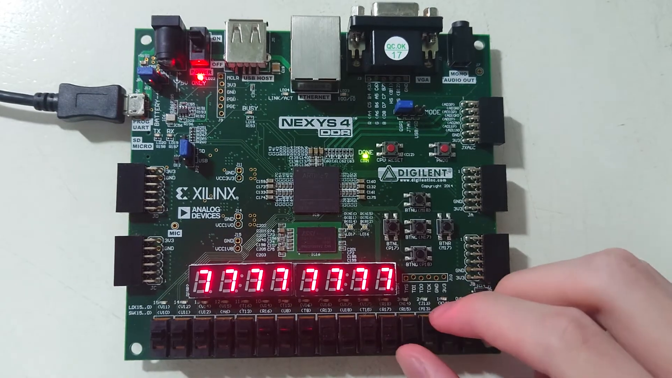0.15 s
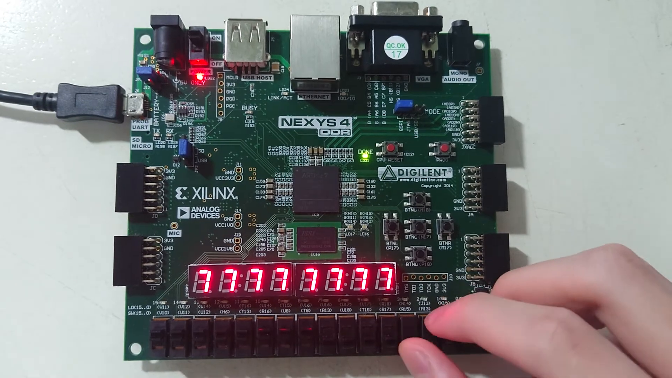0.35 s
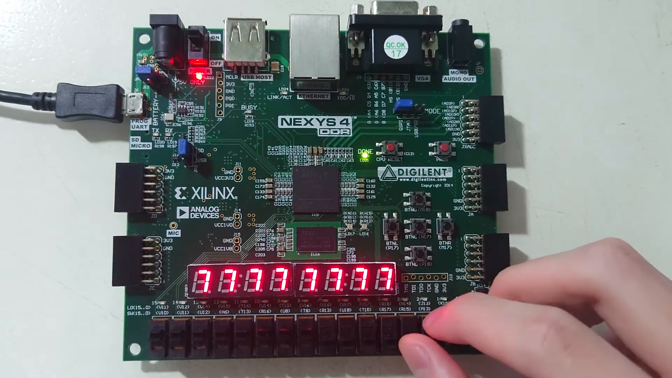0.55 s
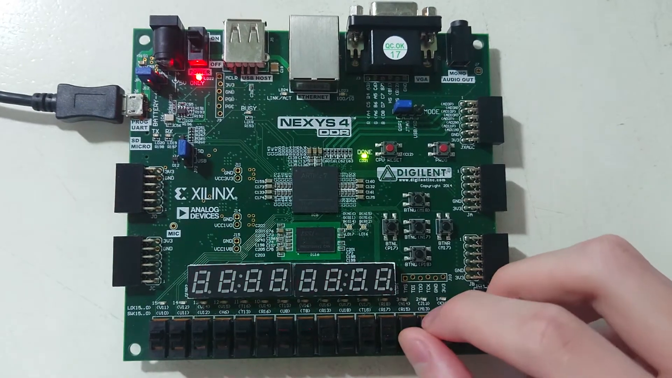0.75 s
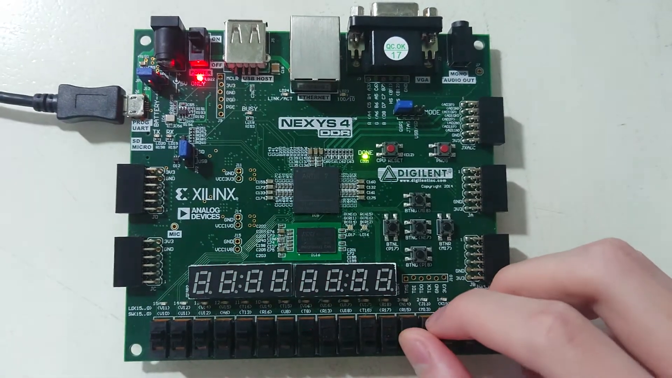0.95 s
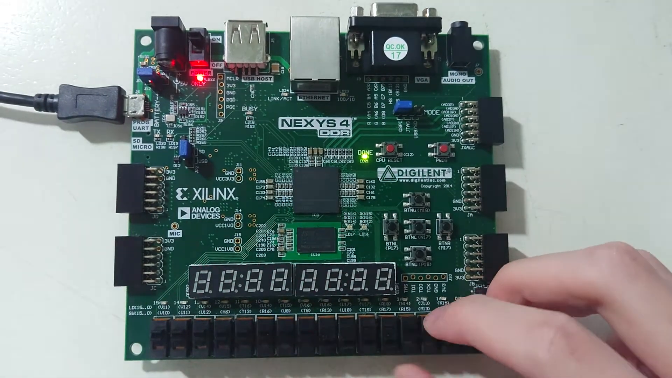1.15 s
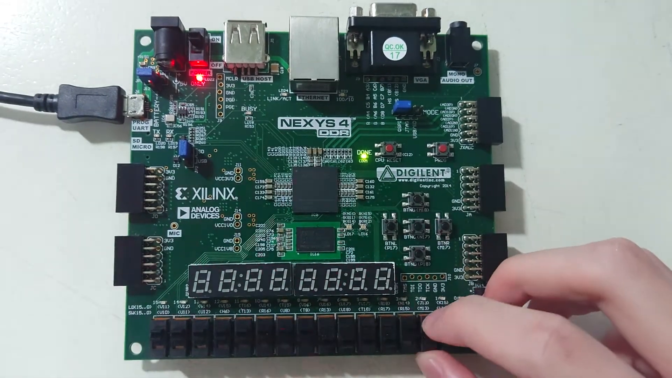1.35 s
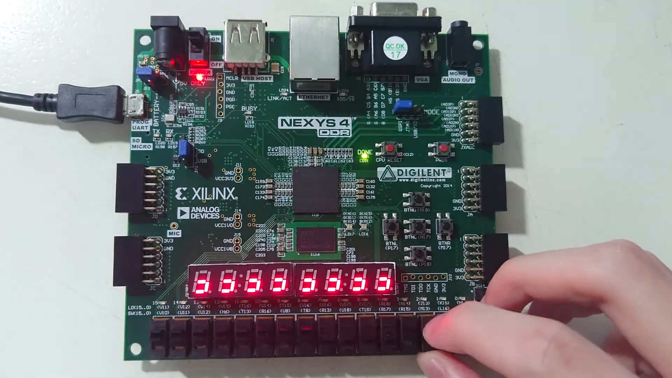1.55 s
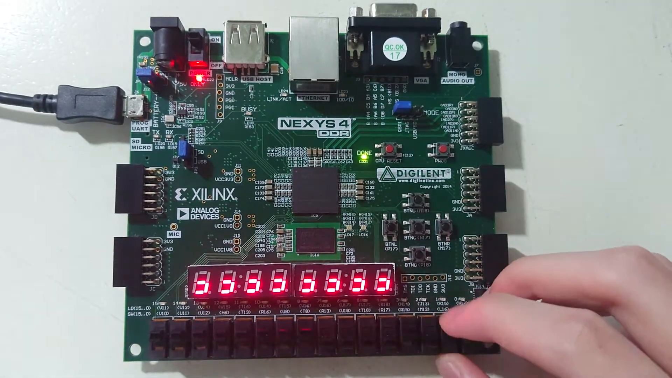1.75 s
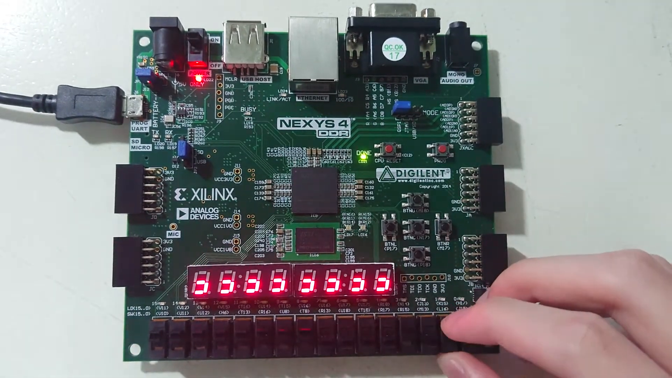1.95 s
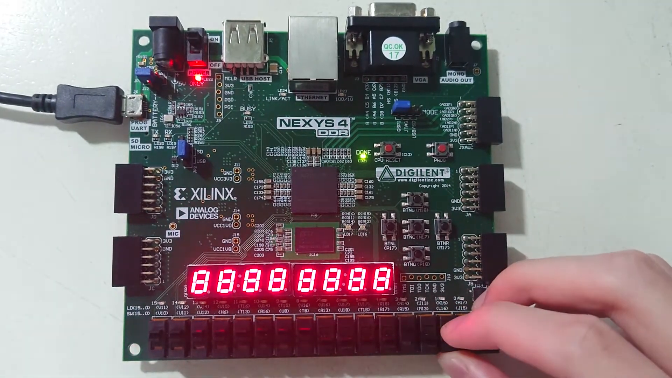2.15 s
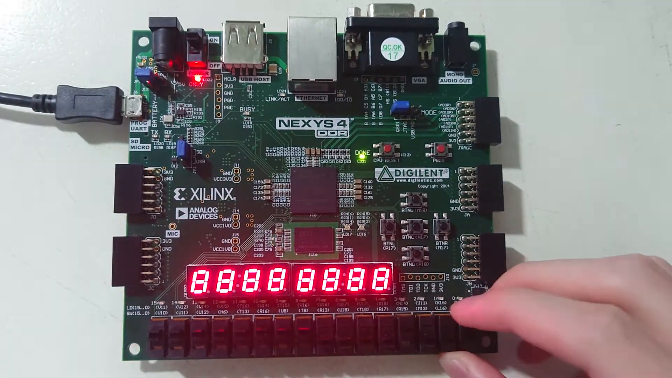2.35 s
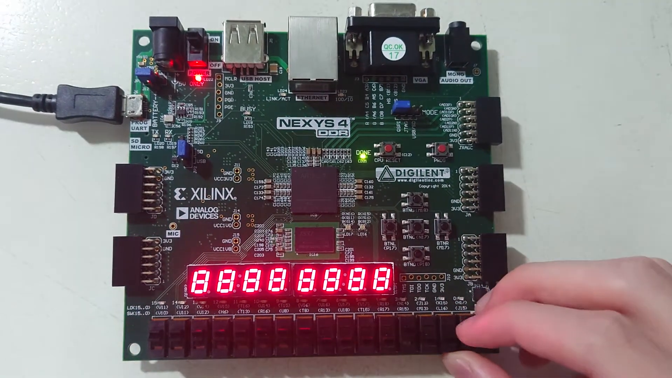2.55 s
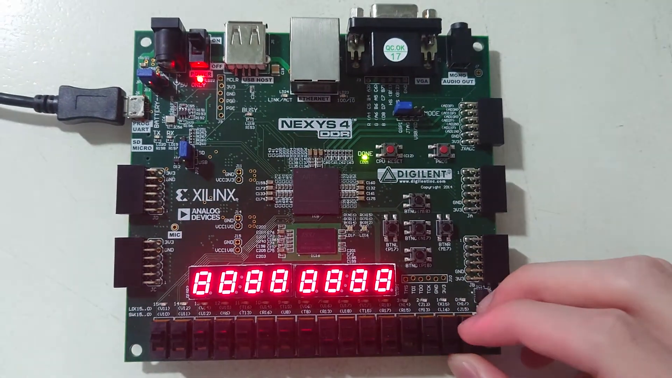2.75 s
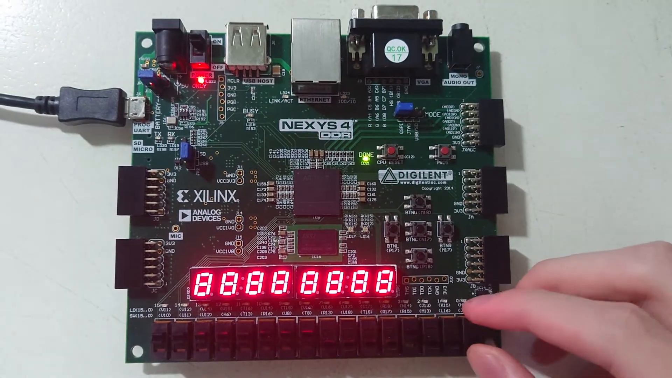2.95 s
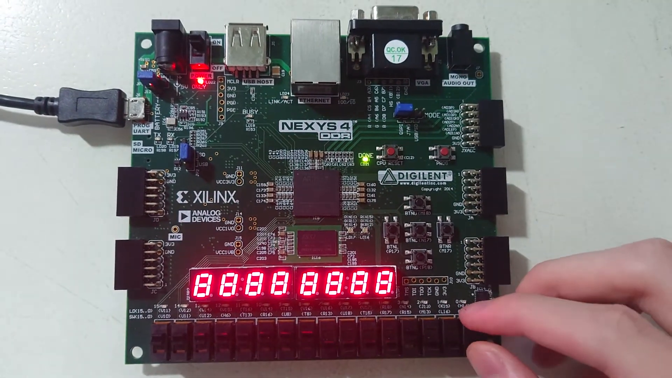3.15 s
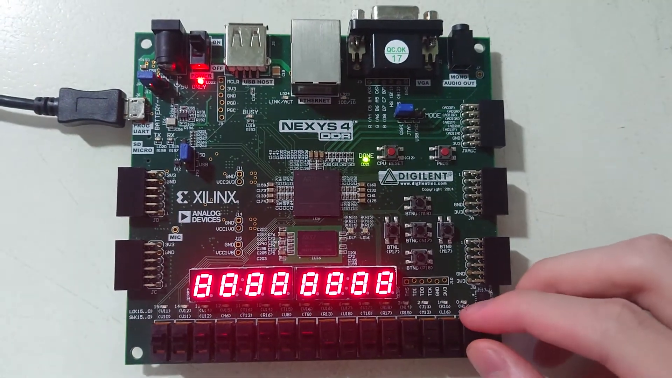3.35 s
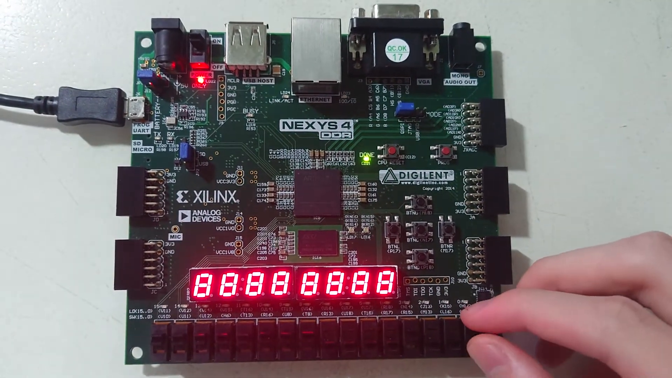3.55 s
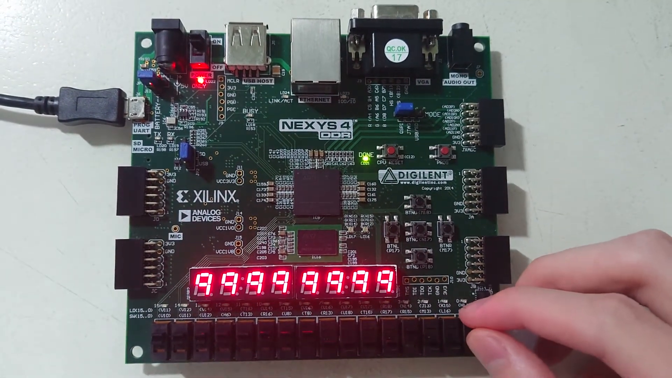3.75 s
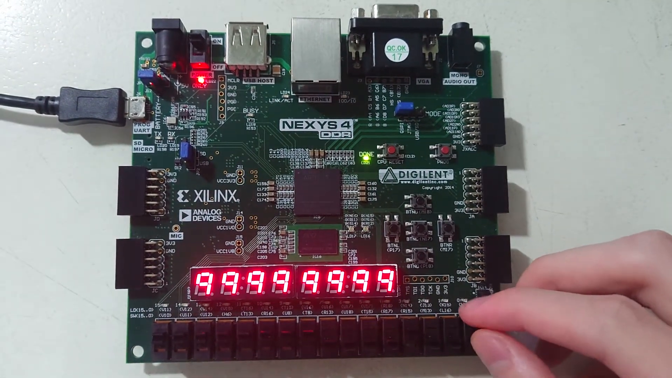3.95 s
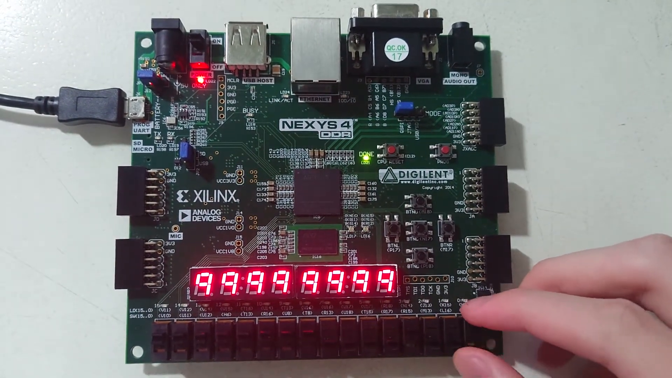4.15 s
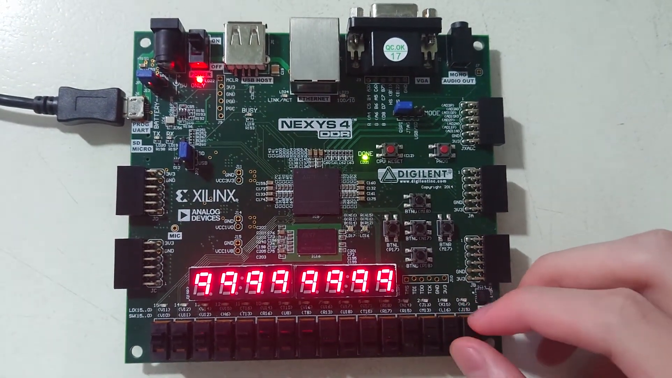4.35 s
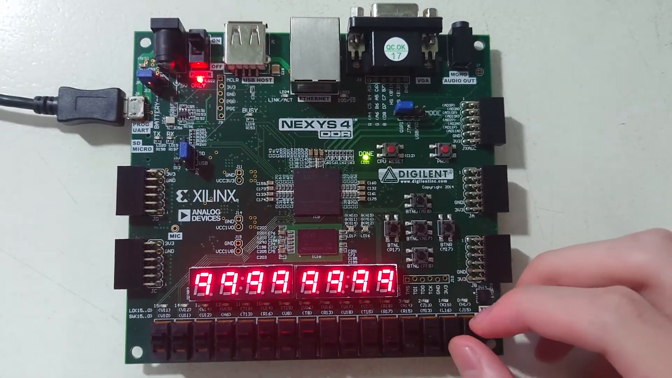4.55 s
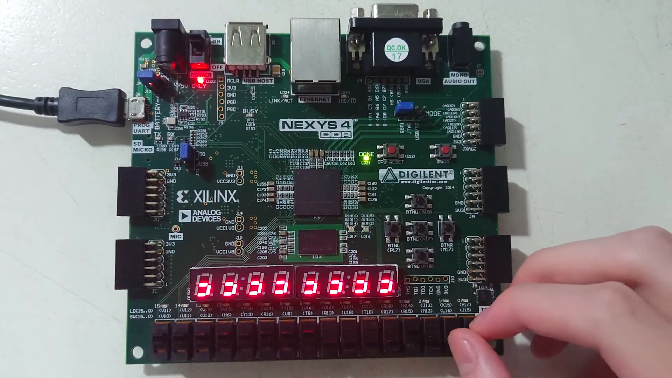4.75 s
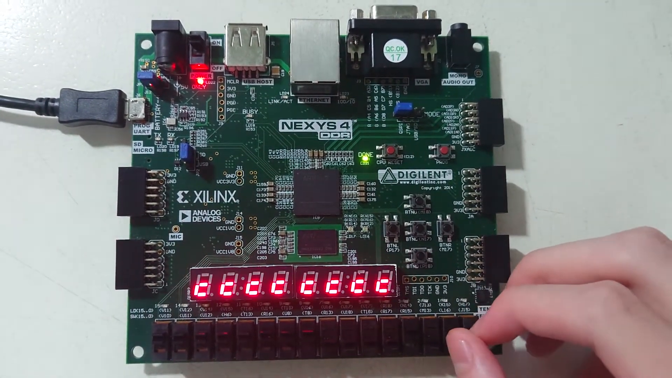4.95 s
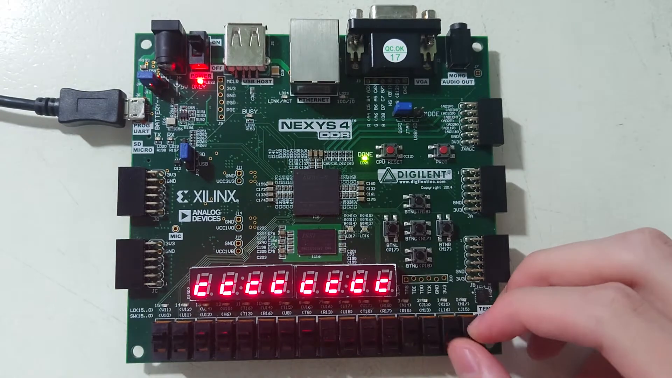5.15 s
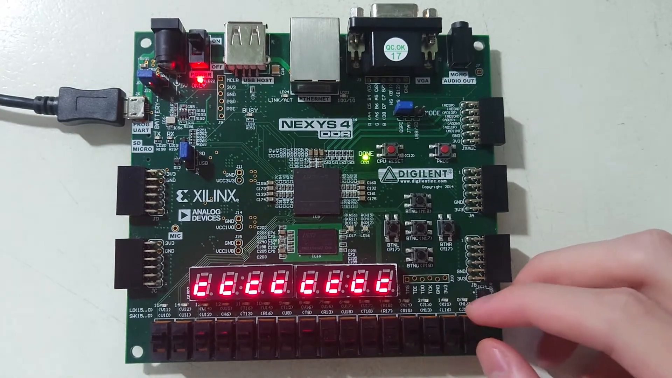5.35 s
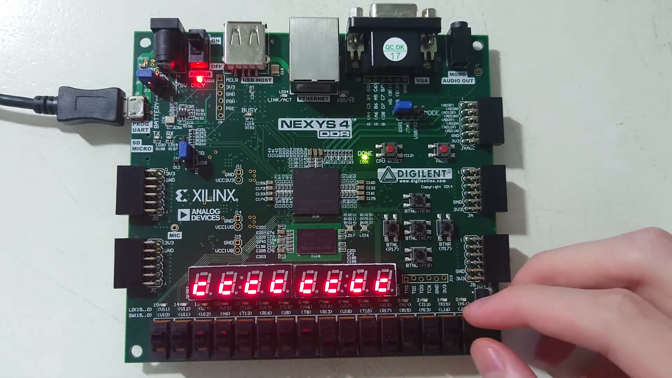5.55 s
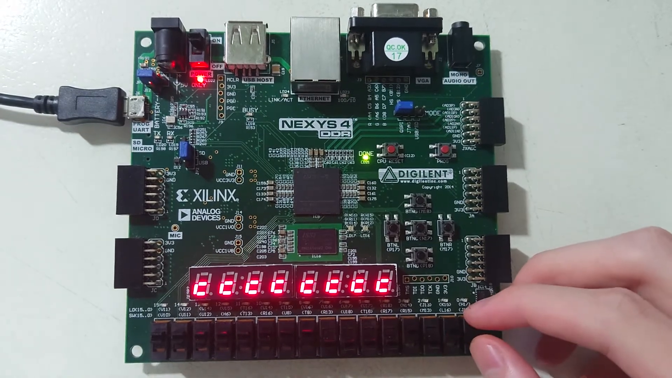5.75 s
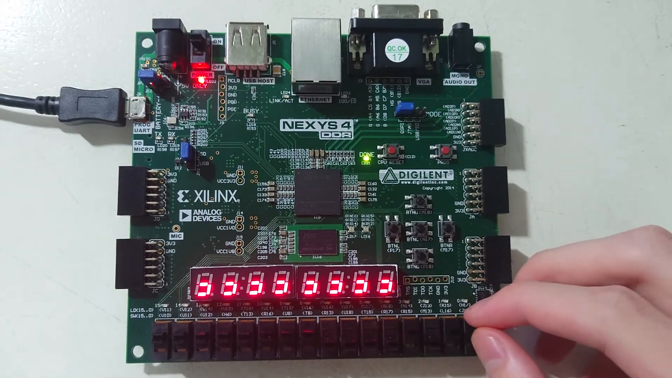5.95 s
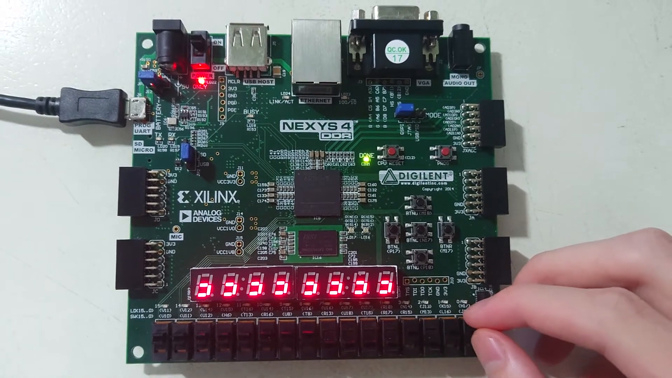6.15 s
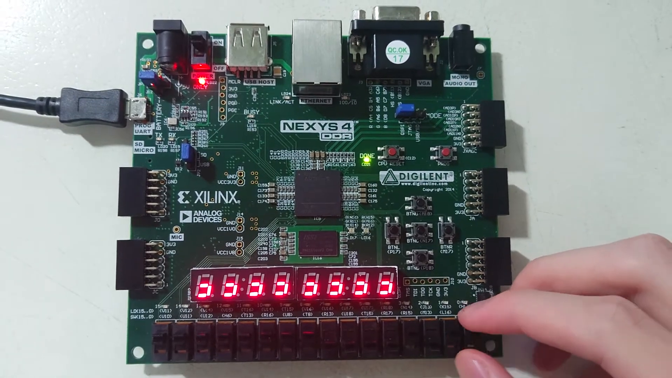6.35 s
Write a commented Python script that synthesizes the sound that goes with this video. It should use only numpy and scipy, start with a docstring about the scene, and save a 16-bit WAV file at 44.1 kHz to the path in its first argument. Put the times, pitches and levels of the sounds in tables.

```python
"""Mains hum throbs against a motor tone, over deep drones, a whirring fan and soft hiss in a quiet room.
Then a finger nudges a small slide switch on a circuit board and flips it six times, on a desk.
Each snap sets damped modes of board, case and contact spring ringing for a few hundredths of a second,
with a burst of grating noise and a faint, diffuse room tail.
The machines are drifting sines with moving levels; the air is stereo noise shaped over frequency."""
import sys
import numpy as np
from scipy import signal
from scipy.fft import rfft, irfft
from scipy.io import wavfile

SR = 44100
rng = np.random.default_rng(int(sys.argv[2]) if len(sys.argv) > 2 else 0)


def file_out(sig):
    """Save sig as 16-bit WAV at sys.argv[1]."""
    # one column per channel
    cols = np.atleast_2d(sig).T
    # limit, then scale
    lim = np.clip(cols, -1, 1)
    pcm = np.round(lim * 32767).astype(np.int16)
    wavfile.write(sys.argv[1], SR, pcm)


N = 282353
TIME = np.arange(N) / SR  # s

# The mains hum, and a motor tone this much faster that dips it once a beat, first near DIP_S.
MAINS_HZ, BEAT_HZ, DIP_S = 120, 2.27, 0.23
# Weaker mains and motor tones: (frequency [Hz], level [dB], left minus right [dB])
WEAK_HUM = [(34.8, -77.5, 0), (117.4, -59, -9), (126.6, -62, 3), (174.3, -70.5, 7), (240, -62, -18)]

MOTOR_HZ, SHAFT_HZ = 58.2, 66.7
# The low motor drone sinks, partly returns and fades: (time [s], level [dB])
MOTOR_LEVEL = [(0, -52.5), (1.3, -55.5), (1.9, -65), (4, -59), (6.4, -70)]
# The fan shaft's drone swells and sinks slowly about its mean level.
SHAFT_DB, SHAFT_SWING_DB, SHAFT_PERIOD_S, SHAFT_PEAK_S = -60, 3.5, 5.7, 0.72

# Weak fan tones: (frequency [Hz], level ahead of the fan's gain [dB], left minus right [dB])
WEAK_FAN = [(133.9, -61, -1), (200.5, -66, 4), (402.8, -64.5, 4), (471, -78, -10), (537, -68, -12),
            (643, -66, 4), (867.5, -66, -2), (952, -72, -7), (1014, -68, -1), (1347, -74.5, 10),
            (1403, -79, -3)]
# The fan's two strongest tones, near four and five times the shaft rate:
# (frequency [Hz], left minus right [dB])
BLADES = [(269.3, -3.5), (335, 0.5)]
# Level of the lower blade tone, ahead of its waver: (time [s], level [dB])
LOW_BLADE_LEVEL = [(0, -61), (.85, -66), (1.1, -55), (1.4, -70), (1.9, -60.5), (2.85, -60.5), (3.2, -74),
                   (3.5, -64), (3.75, -70), (4.05, -59.5), (4.55, -62.5), (4.75, -50), (5.1, -63.5),
                   (5.6, -64.5), (6.4, -59.5)]
# Level of the higher blade tone, ahead of its waver: (time [s], level [dB])
HIGH_BLADE_LEVEL = [(0, -63.5), (1.5, -58.5), (2.2, -59), (2.65, -55), (3.05, -58), (3.35, -51),
                    (3.55, -60.5), (3.8, -56.5), (4.4, -58.5), (4.88, -55.5), (5.1, -65), (5.55, -57.5),
                    (5.93, -59.5), (6.08, -73), (6.4, -55.5)]

# The draught through the machines rises from its calm level in one broad swell.
CALM_DB, SWELL_DB, SWELL_PEAK_S, SWELL_HALF_WIDTH_S = -1.23, 2.5, 4.1, 1.9
# Broad colour of moving air and hiss, ahead of gain: (frequency [Hz], density [dB per Hz])
AIR_COLOUR = [(25, -100), (55, -76.5), (80, -81), (105, -70.5), (145, -71.5), (200, -85), (310, -77.5),
              (520, -80), (1250, -84), (1800, -86), (3800, -93.5), (7000, -96), (8000, -101), (14000, -99)]
# Peaks and hollows in the air's sound: (frequency [Hz], half width [Hz], boost [dB])
AIR_PEAKS = [(337, 11, 2.5), (360, 23, -3.5), (402, 27, 2), (484, 47, -4), (641, 28, 2), (738, 46, -5),
             (1003, 84, 2), (1174, 36, 4.5), (1350, 29, 1.5), (1770, 160, 1.5), (3230, 130, 2.3),
             (3630, 180, -1), (7900, 220, -4)]
# Stereo balance of the air: (frequency [Hz], left minus right [dB])
AIR_PAN = [(60, 0), (220, -1.5), (380, 1), (520, -4), (630, -1.5), (780, -5.5), (1000, 0.5), (1700, 2),
           (2400, 4.5), (3600, 1), (7000, -1.5), (15000, -1)]
# Likeness of left and right air: (frequency [Hz], correlation [-1 to 1])
AIR_LIKENESS = [(130, 0.95), (290, 0.73), (640, 0.44), (1400, -0.39), (3000, -0.0024)]

# The slider hitting its stop, rebounding or being nudged; levels are ahead of the switch's gain:
# (time [s], contact [ms], board level [dB], case level [dB], spring level [dB],
#  board favoured [Hz], case favoured [Hz], spring favoured [Hz],
#  board damped by the finger [Hz], case damped [Hz], spring damped [Hz])
CLICKS = [(0.7105, 1.6, -66, -48, -60, 4015, 5650, 15350, 2500, 6700, 10500),
          (1.5398, 1, -36, -29.5, -25.5, 4080, 6930.0, 14000, 3480, 4800, 10300),
          (1.5438, 0.7, -39.5, -37, -33, 2300, 6650.0, 15350.0, 3500, 5400, 10080.0),
          (2.1418, 1.4, -34.5, -33, -30.0, 2210, 5850, 12300, 2600, 5000, 13000),
          (2.1464, 0.9, -40, -37, -42.0, 4330, 5500, 13110.0, 3750, 7300, 10530.0),
          (2.1576, 1.5, -47.5, -33.5, -43.5, 3530.0, 7000, 9650.0, 2820.0, 4890.0, 8100.0),
          (2.1595, 1.3, -50.0, -43, -46.0, 3360.0, 7260.0, 8100.0, 2710.0, 6090.0, 12020.0),
          (2.6178, 0.5, -41, -42, -54.0, 4015, 5870, 10080.0, 2530, 7300, 15000.0),
          (3.6947, 1.2, -62, -52, -47, 4015, 7000, 12450, 2500, 5400, 9400),
          (3.6962, 1.5, -46, -34.5, -38, 3850.0, 5500.0, 12000, 4300, 6400, 10300),
          (3.6989, 1.0, -39.0, -49, -48.5, 2000.0, 7580.0, 9650.0, 2950.0, 4670.0, 8830.0),
          (3.703, 1.3, -43, -52, -49.5, 4015, 6900, 14320.0, 2700, 5400, 8830.0),
          (3.7134, 1.0, -51, -54.5, -60.0, 2000.0, 5840.0, 12550.0, 3680.0, 6650.0, 14970.0),
          (4.7604, 1.5, -60, -51, -52, 4015, 5900, 15350, 2500, 7200, 10500),
          (4.905, 1.4, -39, -30.5, -40, 4015, 6050, 14000, 2430, 5350, 10530.0),
          (4.9105, 1.3, -48.5, -37, -50, 4030.0, 5600, 13200, 3080.0, 5700, 11000.0),
          (5.9987, 1, -43, -37, -43.0, 3325, 5250, 11600, 2650, 6200, 15630.0),
          (6.0005, 1.3, -40, -55, -46, 4015, 5300, 14300.0, 2770, 4800, 13110.0),
          (6.015, 0.8, -57.0, -57.5, -65.0, 2170.0, 5340.0, 10080.0, 1920.0, 6090.0, 13110.0)]
# Modes of the switch on its board:
# (frequency [Hz], time to fall 60 dB [s], relative level [dB], left minus right [dB])
MODES = [(1976, 0.036, -3, 8), (2140, 0.017, 3.5, 16.5), (2257, 0.028, 2, 16), (2680.0, 0.025, 2.5, 19),
         (2826, 0.021, -8, 12.5), (2996, 0.035, -0.5, 8), (3310, 0.027, 4, 10.5), (3770, 0.023, 0, 14),
         (4037, 0.026, 2.5, 10), (4250, 0.019, 5, 7), (5040, 0.014, -7.0, -1), (5016, 0.022, -5.0, 11),
         (5250, 0.02, -1, 3), (5630, 0.014, -1.0, 6), (5870.0, 0.03, -3.5, 0), (6140, 0.026, -6.5, 3.5),
         (6490, 0.014, -3.5, -2), (6860, 0.017, -3.5, 10), (7200, 0.0096, -0.5, 6), (8520, 0.012, -16, 0),
         (9470, 0.013, -10.5, 2.0), (10500, 0.015, -4.5, 7.5), (11350.0, 0.012, -7, 13.0),
         (12500, 0.013, -9, 12.0), (13020.0, 0.014, -8, 7.0), (13540, 0.015, -2.5, 6.5),
         (14900, 0.014, -2.5, 2.5), (15350.0, 0.015, 1.0, 4)]
# Borders between board (lowest), case and spring (highest): (frequency [Hz])
PART_EDGES = [4600, 8000]
# How strongly a flip favours one region of board, case and spring:
# (boost [dB], half width [share of the frequency])
FAVOUR = [(7, 0.05), (7, 0.062), (8, 0.054)]
# How strongly the finger damps another region of each: (boost [dB], half width [share of the frequency])
DAMPING = [(-14.5, 0.073), (-10.5, 0.051), (-9, 0.048)]
# Colour of the grating contact: (frequency [Hz], relative level [dB])
GRATING_COLOUR = [(2000, -11), (4600, -9), (5700, 2), (7200, 3), (8000, 0.5), (10000, 5.5), (11200, 8),
                  (13300, 6), (14200, 7), (15400, 7), (16000, -6)]
# The switch lies nearer the left microphone, so its ring reaches the right one later.
RIGHT_LAG_MS = .148

# Colour of the room's answer: (frequency [Hz], relative level [dB])
ROOM_COLOUR = [(2000, -4), (3500, -5), (4100, 0.5), (4800, 0), (5950, 3), (7200, -1.5), (9000, -7),
               (13500, -1.5), (15500, -4)]
TOP_HZ = 16000  # upper limit of the sound


def undb(db):
    """Decibels to gain."""
    return 10 ** (np.asarray(db) / 20)


def sides(pan_db):
    """Left and right gains of unit mean power."""
    gains = undb(np.array([[pan_db], [-pan_db]]) / 2)
    return gains / np.sqrt(np.mean(gains ** 2))


def bell(x, centre, width):
    """A rounded peak of height 1."""
    return np.exp(-((x - centre) / width) ** 2)


def over_hz(table, size):
    """A (frequency, value) curve read on a log scale at the bins of a spectrum."""
    hz, value = np.transpose(table)
    bins = np.fft.rfftfreq(size, 1 / SR)
    return np.interp(np.log(bins + 1), np.log(hz), value)


def over_time(curve):
    """A (time, level) curve drawn out sample by sample."""
    return np.interp(TIME, *np.transpose(curve))


def walk(rate_hz):
    """Smooth random motion of unit spread: noise kept to slow rates."""
    shape = np.exp(-.5 * (np.fft.rfftfreq(2 * N, 1 / SR) / rate_hz) ** 2)
    motion = irfft(rfft(rng.standard_normal(2 * N)) * shape)
    return motion[:N] / motion.std()  # half is dropped, so the ends need not meet


def tone(hz, drift_hz, drift_rate):
    """A sine of unit rms whose pitch wanders."""
    turns = np.cumsum(hz + drift_hz * walk(drift_rate)) / SR + rng.random()
    return np.sqrt(2) * np.sin(2 * np.pi * turns)


def draught():
    """Strength of the draught in dB: one slow rise and fall."""
    return CALM_DB + SWELL_DB * bell(TIME, SWELL_PEAK_S, SWELL_HALF_WIDTH_S)


def hum(mains_db=-48.0, beat_db=-56.5, beat_wander_db=2.0, slip_turns=0.023):
    """Mains hum and a faster, unsteady motor tone interfere and follow the draught; weak tones join them."""
    turns = MAINS_HZ * TIME + rng.random()
    slip = BEAT_HZ * (TIME - DIP_S) + slip_turns * walk(0.79)
    mains = undb(mains_db) * np.sin(2 * np.pi * turns)
    rival_db = beat_db + beat_wander_db * walk(0.36)
    rival = undb(rival_db) * np.sin(2 * np.pi * (turns + slip))
    beating = sides(-2.6) * mains - sides(-.5) * rival
    out = np.sqrt(2) * beating * undb(draught())
    for hz, db, pan_db in WEAK_HUM:
        out = out + undb(db) * sides(pan_db) * tone(hz, drift_hz=0.097, drift_rate=0.84)
    return out


def drones(pan_db=-2.0):
    """Two deep wandering sines: the motor's follows its fades, the fan shaft's swells and sinks."""
    shaft_turns = (TIME - SHAFT_PEAK_S) / SHAFT_PERIOD_S
    shaft_db = SHAFT_DB + SHAFT_SWING_DB * np.cos(2 * np.pi * shaft_turns)
    motor = undb(over_time(MOTOR_LEVEL)) * tone(MOTOR_HZ, drift_hz=0.21, drift_rate=0.55)
    shaft = undb(shaft_db) * tone(SHAFT_HZ, drift_hz=0.72, drift_rate=1.45)
    return sides(pan_db) * (motor + shaft)


def fan(gain_db=-2.0, waver_db=3.0, response=0.64, blade_waver_db=2.3):
    """Turbulent air blurs the fan's tones; weak ones rise with the draught, two blade tones swell and fade."""
    weak = 0
    for hz, db, pan_db in WEAK_FAN:
        level_db = db + waver_db * walk(2.6)
        weak = weak + undb(level_db) * sides(pan_db) * tone(hz, drift_hz=1.293, drift_rate=2.57)
    out = undb(gain_db + response * draught()) * weak
    for (hz, pan_db), curve in zip(BLADES, (LOW_BLADE_LEVEL, HIGH_BLADE_LEVEL)):
        level_db = over_time(curve) + blade_waver_db * walk(3.8)
        out = out + undb(level_db) * sides(pan_db) * tone(hz, drift_hz=1.3, drift_rate=2.05)
    return out


def air(gain_db=0.49, flutter_db=0.68, response=0.09):
    """Rushing air, nearly alike in both ears in the bass, thinning into smooth hiss."""
    bins = np.fft.rfftfreq(N, 1 / SR)
    mid, side = rfft(rng.standard_normal((2, N)))
    likeness = np.clip(over_hz(AIR_LIKENESS, N), -1, 1)
    sign = np.array([[1], [-1]])  # left, right
    both = mid * np.sqrt(1 + likeness) + sign * side * np.sqrt(1 - likeness)
    peaks_db = sum(db * bell(bins, hz, width) for hz, width, db in AIR_PEAKS)
    colour_db = over_hz(AIR_COLOUR, N) + peaks_db + sign * over_hz(AIR_PAN, N) / 2
    both = both * undb(colour_db) * np.sqrt(SR) / 2  # the factor turns dB per Hz into sample level
    # only the air flow flutters; the hiss above it is even
    flow_share = 1 / (1 + (bins / 1500) ** 2)
    flow = irfft(both * flow_share, N)
    hiss = irfft(both * (1 - flow_share), N)
    flutter = undb(flutter_db * walk(5.1) + response * draught())
    return undb(gain_db) * (flow * flutter + hiss)


def ringing(t, force, drive_db, detune=0.0019, scatter_db=0.8, stray_turns=0.11):
    """The contact force pumps up each mode of board, case and spring, which then dies away."""
    bins = np.fft.rfftfreq(len(t), 1 / SR)
    arrival = t - np.array([[0], [RIGHT_LAG_MS / 1000]])  # delays the right wave, not its envelope
    ring = 0
    for hz, t60, db, pan_db in MODES:
        shift, size = rng.standard_normal(2)
        mode_hz = hz * (1 + detune * shift)
        mode_db = db + scatter_db * size + np.interp(hz, bins, drive_db)
        envelope = signal.fftconvolve(force, undb(-60 * t / t60))[:len(t)]
        start_turns = rng.random() + stray_turns * rng.standard_normal((2, 1))
        wave = np.sin(2 * np.pi * (mode_hz * arrival + start_turns))
        ring = ring + undb(mode_db) * sides(pan_db) * envelope * wave
    return ring


def grating(t, force, drive_db, crack_t60=0.01, buzz_db=-18, buzz_t60=0.056, pan_db=8.0):
    """Plastic grating on metal fills the treble between the modes: a sharp crack, then a weak buzz."""
    decay = undb(-60 * t / crack_t60) + undb(buzz_db - 60 * t / buzz_t60)
    envelope = signal.fftconvolve(force, decay)[:len(t)]
    colour_db = over_hz(GRATING_COLOUR, len(t)) + drive_db
    noise = irfft(rfft(rng.standard_normal((2, len(t)))) * undb(colour_db), len(t))
    return sides(pan_db) * envelope * noise


def snap(contact_ms, part_dbs, favoured_hzs, damped_hzs):
    """The slider scrapes home in a brief push of force; the parts ring and crackle after it."""
    t = np.arange(int(.08 * SR)) / SR
    force = np.sin(np.pi * np.minimum(t * 1000 / contact_ms, 1)) ** 2
    force = force / force.sum()
    bins = np.fft.rfftfreq(len(t), 1 / SR)
    drive_db = np.array(part_dbs)[np.searchsorted(PART_EDGES, bins)]
    # the finger loads the switch differently on every flip: it favours some modes and damps others
    regions = zip([*favoured_hzs, *damped_hzs], [*FAVOUR, *DAMPING])
    for hz, (db, width) in regions:
        drive_db = drive_db + db * bell(bins, hz, width * hz)
    return ringing(t, force, drive_db) + grating(t, force, drive_db)


def switch(gain_db=0.28, lowest_hz=1450):
    """All the snaps, each at its moment, with nothing left below about 1.5 kHz."""
    out = np.zeros((2, N))
    for start, contact_ms, *columns in CLICKS:
        part_dbs, favoured_hzs, damped_hzs = np.reshape(columns, (3, 3))
        sound = snap(contact_ms, part_dbs, favoured_hzs, damped_hzs)
        at = int(start * SR)
        out[:, at:at + sound.shape[1]] += sound
    low_cut = signal.butter(4, lowest_hz, "high", fs=SR, output="sos")
    return undb(gain_db) * signal.sosfilt(low_cut, out)


def room(x, wet_db=-16, t60=0.23, gap_s=0.0056):
    """A small furnished room answers the left channel with a weak, diffuse stereo tail of decaying noise."""
    t = np.arange(SR // 2) / SR
    onset = 1 - np.exp(-(t / gap_s) ** 2)
    tail = rng.standard_normal((2, len(t))) * undb(-60 * t / t60) * onset
    tail = tail / np.sqrt(np.sum(tail ** 2, axis=1, keepdims=True))
    tail = irfft(rfft(tail) * undb(over_hz(ROOM_COLOUR, len(t))), len(t))
    return undb(wet_db) * signal.fftconvolve(x[:1], tail, axes=1)[:, :N]


def scene():
    """The switch close by, the room and its machines behind."""
    clicks = switch()
    return hum() + drones() + fan() + air() + clicks + room(clicks)


def record(dry):
    """Steep low-pass: nothing is heard above TOP_HZ."""
    top_cut = signal.ellip(10, .2, 70, TOP_HZ, fs=SR, output="sos")
    return signal.sosfilt(top_cut, dry)


dry = scene()
out = record(dry)
file_out(out)
```